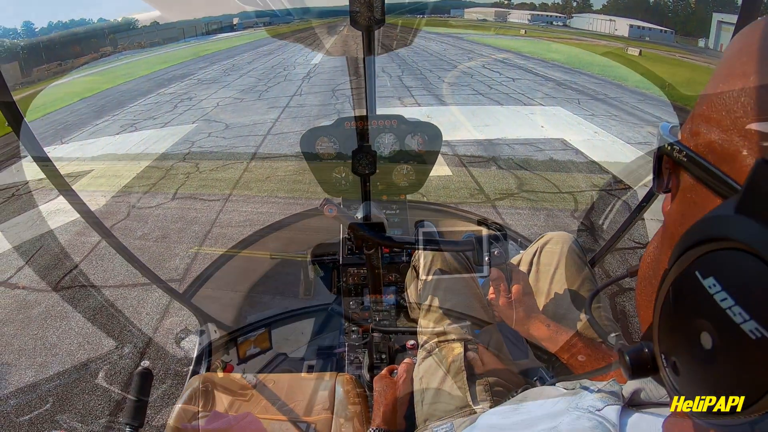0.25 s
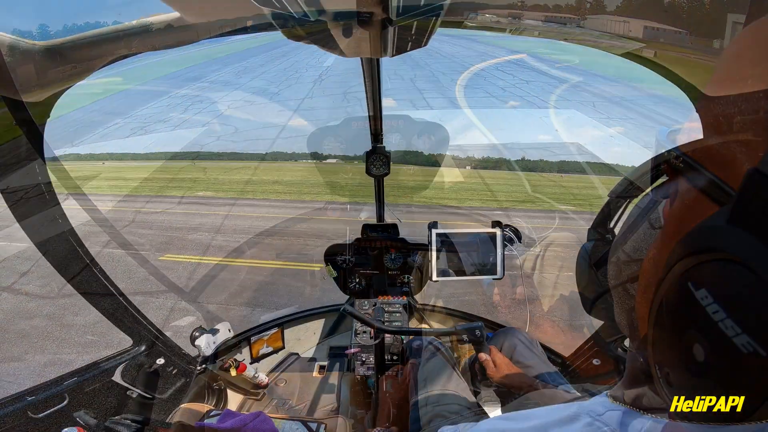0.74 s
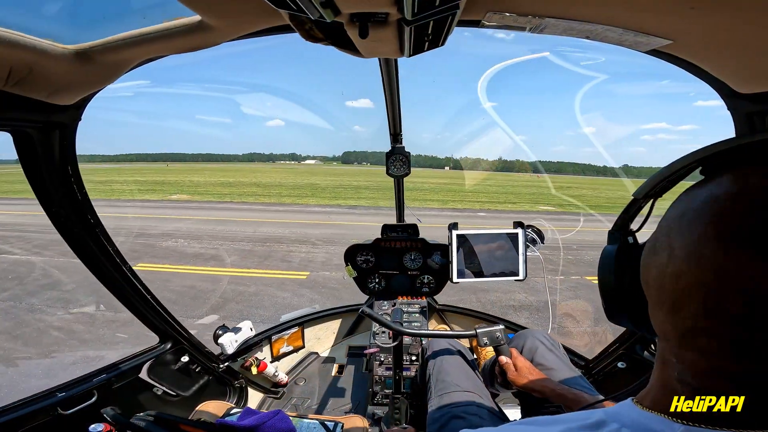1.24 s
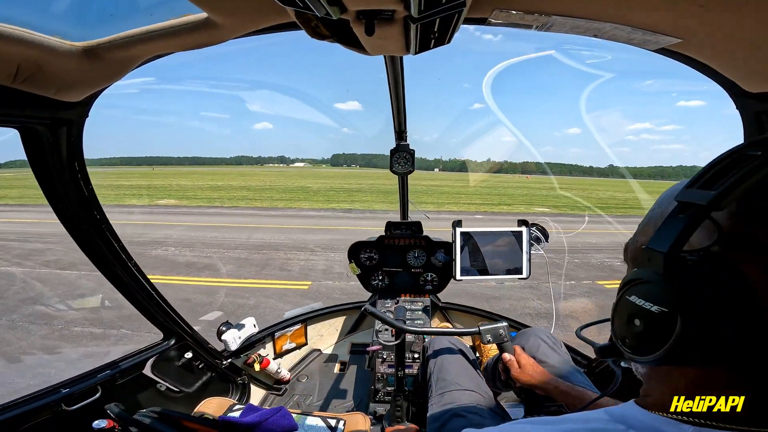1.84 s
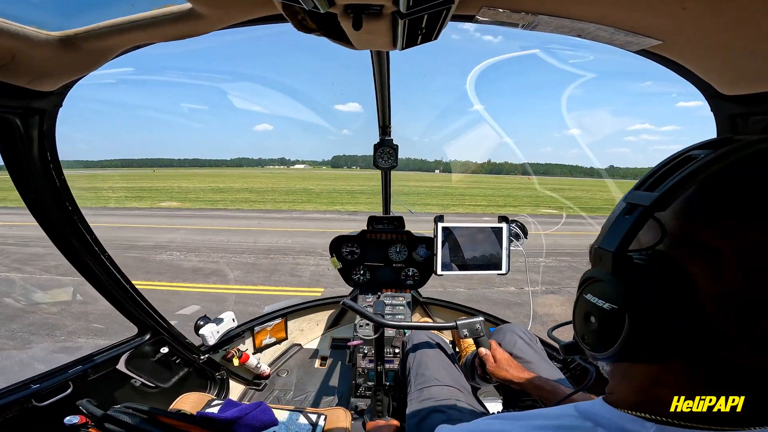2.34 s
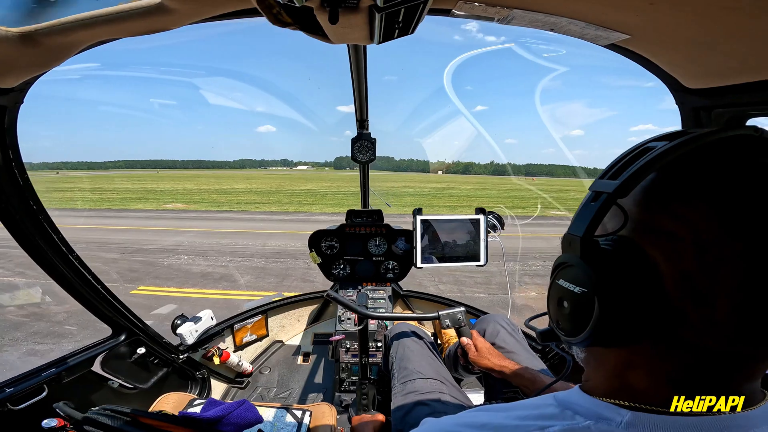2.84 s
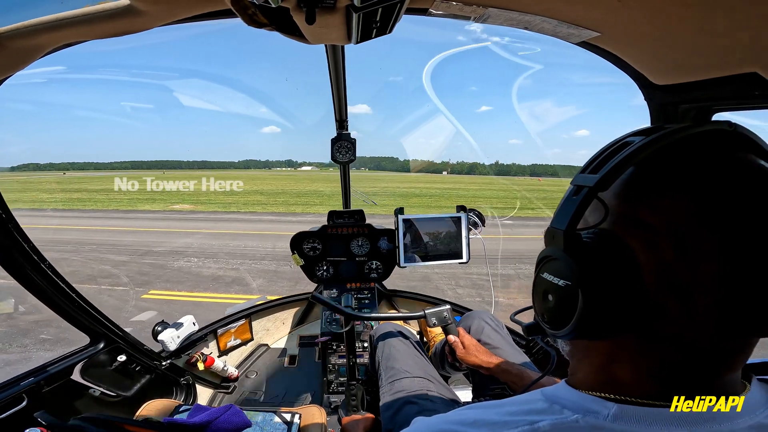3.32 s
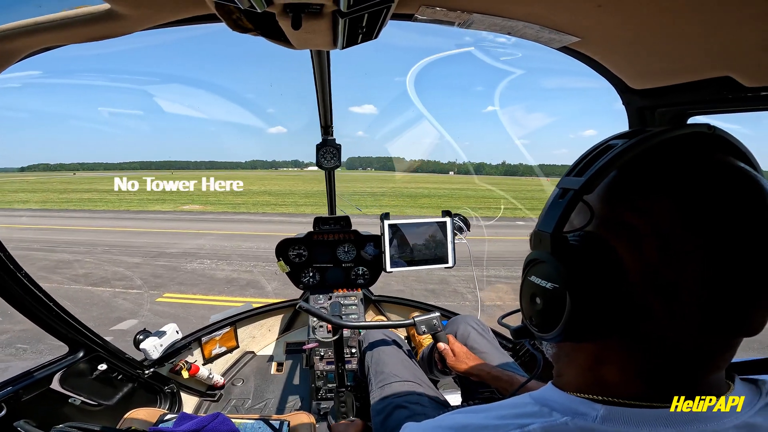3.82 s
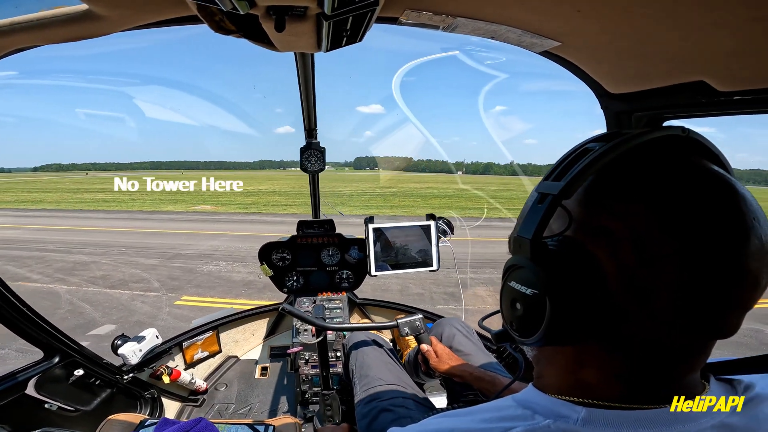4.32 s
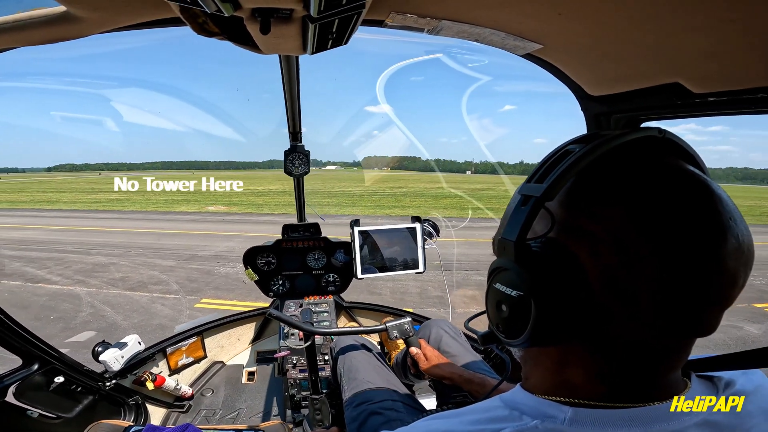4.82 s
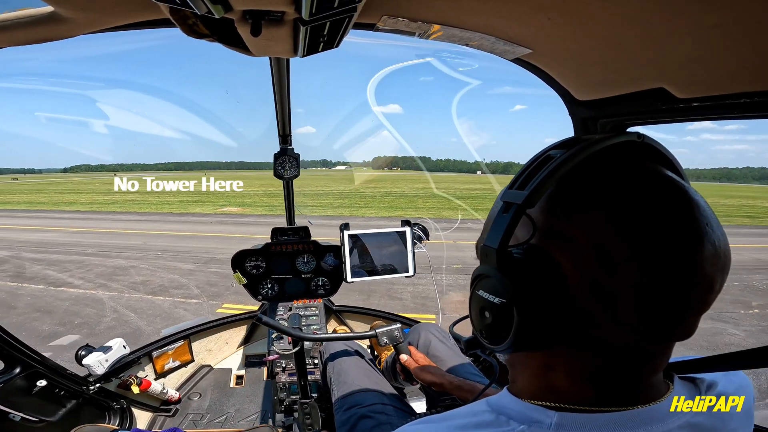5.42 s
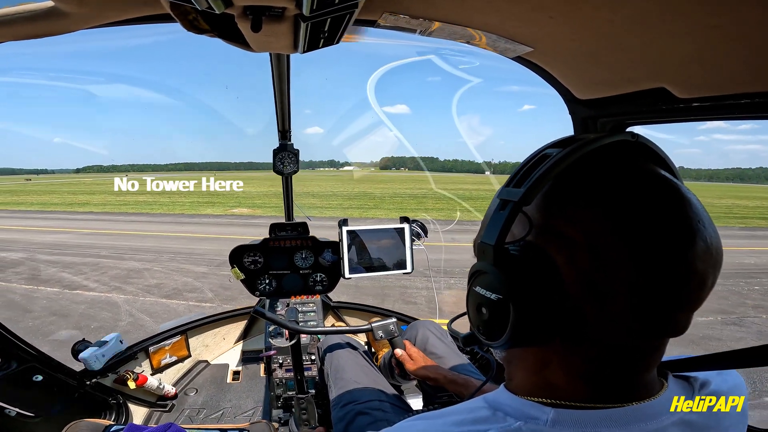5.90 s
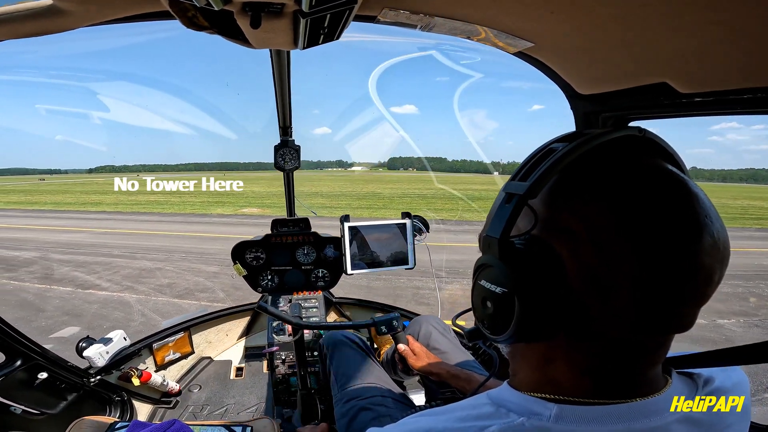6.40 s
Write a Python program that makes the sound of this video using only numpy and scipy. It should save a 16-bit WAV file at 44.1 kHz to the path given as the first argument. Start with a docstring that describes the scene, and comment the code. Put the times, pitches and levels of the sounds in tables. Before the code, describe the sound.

Inside a piston helicopter cabin, a steady low engine drone fades up, with uneven rotor throb, soft rasp and a muffled rush of air.

```python
"""Inside the cabin of a hovering piston helicopter, heard in order of time.
From the start a six-cylinder engine hums as harmonics of its cycle, and noise puffs rasp at each firing.
Geared to the same rotation, the main rotor throbs and the tail rotor buzzes; filtered noise is the rush of air.
The gain rises linearly over the first 2.5 s; the blade throb then grows unevenly.
After about 5 s the rush of air swells slightly and stays up."""
import sys
import numpy as np
from scipy import signal
from scipy.fft import rfft, irfft, next_fast_len
from scipy.io import wavfile
from scipy.ndimage import uniform_filter1d, minimum_filter1d, map_coordinates

SR = 44100
rng = np.random.default_rng(int(sys.argv[2]) if len(sys.argv) > 2 else 0)


def materialize(psi):
    """Save the field psi as 16-bit PCM at rate SR to the path in sys.argv[1].

    A 1-D psi becomes a single channel; in a 2-D psi each row is a channel.
    """
    bounded = np.clip(np.atleast_2d(psi).T, -1, 1)
    quanta = np.round(bounded * 32767).astype(np.int16)
    wavfile.write(sys.argv[1], SR, quanta)


N = 293441  # samples
TIME_S = np.arange(N) / SR


def amp(db):
    """Level law: a gain is ten to the power of dB / 20."""
    return 10 ** (np.asarray(db) / 20)


def unit(x):
    """Normalisation: the signal scaled to rms 1."""
    return x / np.sqrt(np.mean(x ** 2) + 1e-20)


def along(points, hz):
    """Logarithmic interpolation: (f/Hz, value) points joined on a log frequency axis."""
    f, v = np.transpose(points)
    return np.interp(np.log(hz + 1), np.log(f + 1), v)


def curves(rows):
    """Linear interpolation in time: one curve for each column after t/s."""
    t, *columns = np.transpose(rows)
    return [np.interp(TIME_S, t, column) for column in columns]


def ramp(start_s, length_s):
    """Linear onset: 0 until the start, a straight rise to 1, then held."""
    return np.clip((TIME_S - start_s) / length_s, 0, 1)


def wobble(rate):
    """Slow random modulation: a smooth curve through random knots, rate knots a second."""
    coarse = np.arange(0, N + 64, 64)
    knots = rng.standard_normal(int(N * rate / SR) + 4)
    smooth = map_coordinates(knots, [coarse * rate / SR + 1])
    return np.interp(np.arange(N), coarse, smooth)


def filtered(x, response):
    """Linear filtering: the spectrum multiplied by a response of frequency."""
    size = next_fast_len(N + SR // 2)
    hz = np.fft.rfftfreq(size, 1 / SR)
    return irfft(rfft(x, size) * response(hz), size)[:N]


def coloured(x, spectrum):
    """Spectral shaping: the signal through an (f/Hz, level/dB) response, at rms 1."""
    return unit(filtered(x, lambda hz: amp(along(spectrum, hz))))


def harmonics(turns, orders, flutter_db, smear, rate, dispersion):
    """Fourier synthesis: phase-locked multiples of a rotation, dispersed and wavering in phase and level.

    flutter_db and smear (rad) scale the wavering, rate is in knots a second; the sum has rms 1.
    """
    total = np.zeros(N)
    for multiple, db in orders:
        phase = 2 * np.pi * multiple * turns + dispersion * multiple ** 2 + smear * wobble(rate)
        total += amp(db + flutter_db * wobble(rate)) * np.sin(phase)
    return unit(total)


CYLINDERS = 6
# airframe dispersion: phase shift in radians per squared multiple of the engine cycle
DISPERSION = .557
GROWL_DB = -34.5
# multiples of the engine cycle: the slowly beating line and the singing panel
BEAT_ORDER, PANEL_ORDER = 9, 30
# slow beat: mean level (dB), depth (dB), first peak (s), period (s)
BEAT_DB, BEAT_DEPTH_DB, BEAT_PEAK_S, BEAT_PERIOD_S = -44, 3.5, 0.92, 1.06
# growl of unequal cylinders: [multiple of the engine cycle, relative level/dB]
GROWL_ORDERS = [(1, -44), (2, -43), (3, -48), (4, -48), (5, -38.5), (8, -54.5), (10, -43.5), (11, -53),
                (13, -49), (15, -59), (16, -51.5), (17, -58), (18, -51), (19, -56), (20, -53.5),
                (21, -52.5), (22, -58.5), (23, -52.5), (24, -55), (26, -57.5), (27, -58.5), (28, -54.5),
                (29, -56), (32, -63.5), (34, -61.5), (35, -66)]
# high engine orders that set the panels singing: [multiple of the engine cycle, relative level/dB]
WHINE_ORDERS = [(33, -1), (36, -5), (39, -12.5), (48, -18.5)]
# slow waxing and waning of the firing hum: [t/s, level/dB]
HUM_LEVEL = [(0, -27.5), (.6, -29.3), (1.05, -32.5), (1.5, -30), (2, -29), (2.6, -28.5), (3.4, -29.5),
             (4.4, -30.5), (4.95, -31.5), (5.3, -29.5), (6, -32), (6.65, -33)]
# octave of the firing hum: [t/s, level/dB]
OCTAVE_LEVEL = [(0, -45), (.9, -36.5), (1.4, -41.5), (1.85, -37.5), (2.5, -44), (3.6, -42.5), (4.3, -40.5),
                (5, -42), (5.8, -47.5), (6.65, -43)]
# single panel tone, with a short dip near 2.5 s and a rise at the end: [t/s, level/dB]
PANEL_LEVEL = [(0, -50.5), (1.95, -48.4), (2.55, -56), (2.9, -50.5), (5.2, -52.5), (5.85, -50), (6.25, -51),
               (6.65, -43)]
# swelling and sinking of the panels' whine: [t/s, level/dB]
WHINE_LEVEL = [(0, -54), (.7, -48), (1.3, -49.5), (1.8, -51.5), (2.6, -49.5), (3.05, -48.5), (4.2, -50),
               (5.05, -53.5), (5.6, -48.5), (6.65, -45.5)]


def engine(cycles):
    """Harmonic excitation: equal firings give hum and octave, unequal ones growl, and panels sing along."""
    hum_db, = curves(HUM_LEVEL)
    octave_db, = curves(OCTAVE_LEVEL)
    panel_db, = curves(PANEL_LEVEL)
    whine_db, = curves(WHINE_LEVEL)
    beat_phase = 2 * np.pi * (TIME_S - BEAT_PEAK_S) / BEAT_PERIOD_S
    beat_db = BEAT_DB + BEAT_DEPTH_DB * np.cos(beat_phase)
    hum = harmonics(cycles, [(CYLINDERS, 0)], flutter_db=.35, smear=.05, rate=7, dispersion=DISPERSION)
    octave = harmonics(cycles, [(2 * CYLINDERS, 0)], flutter_db=.8, smear=.12, rate=10, dispersion=DISPERSION)
    beat = harmonics(cycles, [(BEAT_ORDER, 0)], flutter_db=.1, smear=.17, rate=5.2, dispersion=.584)
    growl = harmonics(cycles, GROWL_ORDERS, flutter_db=1.0, smear=.19, rate=3, dispersion=DISPERSION)
    panel = harmonics(cycles, [(PANEL_ORDER, 0)], flutter_db=1.2, smear=.17, rate=4, dispersion=DISPERSION)
    whine = harmonics(cycles, WHINE_ORDERS, flutter_db=.5, smear=.068, rate=4, dispersion=DISPERSION)
    firing = amp(hum_db) * hum + amp(octave_db) * octave
    uneven = amp(beat_db) * beat + amp(GROWL_DB) * growl
    return firing + uneven + amp(panel_db) * panel + amp(whine_db) * whine


RASP_DB = -47
# exhaust puff strength of each cylinder in firing order: [relative level/dB]
PUFF_LEVEL = [1.2, 0.33, -1, -1, 1.8, 0]
# exhaust pulses after muffler and firewall: [f/Hz, relative level per Hz/dB]
RASP_SPECTRUM = [(150, -26), (400, -6.5), (750, 0), (950, -10), (1300, -11), (1700, -23), (2300, -20.5),
                 (4000, -36), (8000, -120)]


def exhaust(cycles, puff_share):
    """Pulsed turbulence: noise decays exponentially after each firing, with time constant puff_share of a gap."""
    firings = cycles * CYLINDERS
    cylinder = np.floor(firings).astype(int) % CYLINDERS
    envelope = amp(PUFF_LEVEL)[cylinder] * np.exp(-(firings % 1) / puff_share)
    puffs = envelope * rng.standard_normal(N)
    return amp(RASP_DB) * coloured(puffs, RASP_SPECTRUM)


# trim buzz: level (dB), fall with pitch (dB an octave)
BUZZ_DB, BUZZ_FALL_DB = -57.5, 4


def buzz(cycles, first_order, last_order):
    """Forced vibration: the trim buzzes at high engine multiples, each wavering on its own."""
    orders = []
    for multiple in range(first_order, last_order + 1):
        orders.append((multiple, -BUZZ_FALL_DB * np.log2(multiple / first_order)))
    return amp(BUZZ_DB) * harmonics(cycles, orders, flutter_db=5.5, smear=.18, rate=3, dispersion=DISPERSION)


# blade passes per engine cycle
MAIN_GEAR, TAIL_GEAR = .5978, 3.551
# multiples of the engine cycle: the drive shaft's tone and the low hum
SHAFT_ORDER, LOW_HUM_ORDER = 1.4476, 3.51549
BLADE_DB, BUFFET_DB, TAIL_DB, SHAFT_DB = -39.5, -42.5, -43, -44.5
# steady beat of the main blades: [multiple of the blade-passing rate, relative level/dB]
BLADE_ORDERS = [(1, -43), (5, -52.5), (6, -54.5), (7, -52), (8, -52.5), (9, -50.5), (11, -54), (12, -61),
                (13, -52.5), (16, -51), (18, -58.5), (22, -58.5)]
# blade multiples that boom in the cabin air: [multiple of the blade-passing rate, relative level/dB]
THROB_ORDERS = [(2, -6.5), (3, 2), (4, -1)]
# throb, growing unevenly as the main rotor takes up load: [t/s, level/dB]
THROB_LEVEL = [(0, -40), (.6, -43), (1.3, -37), (2.3, -47.5), (2.85, -33), (3.7, -32), (4.1, -33.5),
               (4.5, -32), (5.1, -30), (5.8, -34.5), (6.25, -34.5), (6.65, -30.5)]
# downwash pressing on the cabin bubble: [f/Hz, relative level per Hz/dB]
BUFFET_SPECTRUM = [(8, -13.5), (22, -4), (36, -0.5), (50, 0.5), (65, -3.5), (110, -12), (220, -40),
                   (600, -120)]
# low hum near 80 Hz, swelling and sinking: [t/s, level/dB]
LOW_HUM_LEVEL = [(0, -43), (1.15, -40), (1.6, -48.5), (2.25, -53), (2.65, -42), (3.85, -41), (4.35, -50),
                 (4.8, -40), (5.25, -50), (6.1, -46), (6.65, -43)]
# buzz of the tail rotor: [multiple of its blade-passing rate, relative level/dB]
TAIL_ORDERS = [(2, -52.5), (3, -47), (4, -48), (5, -58)]


def rotors(cycles):
    """Blade-passing tones: multiples of each rotor's passing rate, with buffet noise, a shaft tone and a low hum."""
    throb_db, = curves(THROB_LEVEL)
    low_hum_db, = curves(LOW_HUM_LEVEL)
    main_passes = cycles * MAIN_GEAR
    tail_passes = cycles * TAIL_GEAR
    blades = harmonics(main_passes, BLADE_ORDERS, flutter_db=2.5, smear=.14, rate=3.2, dispersion=1.25)
    throb = harmonics(main_passes, THROB_ORDERS, flutter_db=1.0, smear=.1, rate=4.1, dispersion=2.1)
    buffet = coloured(rng.standard_normal(N), BUFFET_SPECTRUM)
    low_hum = harmonics(cycles, [(LOW_HUM_ORDER, 0)], flutter_db=2.4, smear=.23, rate=2.4, dispersion=0)
    tail = harmonics(tail_passes, TAIL_ORDERS, flutter_db=2.5, smear=.23, rate=3, dispersion=.69)
    shaft = harmonics(cycles, [(SHAFT_ORDER, 0)], flutter_db=1.0, smear=.25, rate=2.2, dispersion=0)
    main_rotor = amp(BLADE_DB) * blades + amp(throb_db) * throb + amp(BUFFET_DB) * buffet
    return main_rotor + amp(low_hum_db) * low_hum + amp(TAIL_DB) * tail + amp(SHAFT_DB) * shaft


# levels before the late swell (dB), and the multiple of the engine cycle at which the wash flutters
WASH_DB, HISS_DB, FLUTTER_ORDER = -34.5, -55.5, 4
# late swell: start (s), time taken (s), rise of the wash and of the hiss (dB)
SWELL_START_S, SWELL_S, WASH_SWELL_DB, HISS_SWELL_DB = 5.2, 0.9, 2, 1.1
# turbulent air heard through the shell: [f/Hz, relative level per Hz/dB]
WASH_SPECTRUM = [(20, -23), (62, -2.5), (115, 1.5), (185, -2), (245, -1.5), (285, -2), (350, -4.5),
                 (500, -7.5), (740, -13.5), (900, -18), (1250, -24.5), (1650, -36.5), (3000, -64.5),
                 (8000, -120)]
# air leaking at doors and vents: [f/Hz, relative level per Hz/dB]
HISS_SPECTRUM = [(600, -19), (1200, 0.5), (1500, 0), (1750, 0), (2250, 0), (2650, -3.5), (3080, -5),
                 (3400, -8.5), (4300, -15), (5300, -18), (6400, -23.5), (7400, -25), (7950, -32),
                 (8600, -29.5), (10700, -36), (14300, -39), (15300, -44.5)]
# thin resonances that colour the hiss: [centre f/Hz, width f/Hz, boost level/dB]
SHEEN = [(11800, 450, 4.5), (13700, 650, 8)]


def sheen(hz):
    """Resonant emphasis: Gaussian peaks in level over frequency."""
    return amp(sum(db * np.exp(-((hz - centre) / width) ** 2) for centre, width, db in SHEEN))


def air(cycles, chop_db, lope_db, flutter_db):
    """Amplitude-modulated turbulence: blades pulse wash and hiss; the engine cycle also modulates the wash."""
    chop = chop_db * np.cos(2 * np.pi * cycles * MAIN_GEAR)
    lope = lope_db * np.cos(2 * np.pi * cycles)
    flutter = flutter_db * np.cos(2 * np.pi * cycles * FLUTTER_ORDER)
    wash = coloured(rng.standard_normal(N), WASH_SPECTRUM)
    wash *= amp(chop + lope + flutter + .3 * wobble(7.3))
    hiss = coloured(filtered(rng.standard_normal(N), sheen), HISS_SPECTRUM)
    hiss *= amp(chop + .25 * wobble(8))
    swell = ramp(SWELL_START_S, SWELL_S)
    return amp(WASH_DB + WASH_SWELL_DB * swell) * wash + amp(HISS_DB + HISS_SWELL_DB * swell) * hiss


# almost steady engine speed, before a slight random wavering: [t/s, four-stroke cycle rate f/Hz]
SPEED = [(0, 22.77), (.9, 22.76), (1.4, 22.71), (1.65, 22.64), (2.1, 22.64), (2.7, 22.77), (3.1, 22.825),
         (3.7, 22.84), (4.2, 22.77), (4.65, 22.73), (5.1, 22.76), (5.9, 22.78), (6.3, 22.845),
         (6.65, 22.78)]


def scene():
    """Phase locking: engine, rotors and the pulsing of the air all follow one rotation."""
    speed_hz, = curves(SPEED)
    cycles = np.cumsum(speed_hz * (1 + 0.00017 * wobble(8))) / SR
    rasp = exhaust(cycles, puff_share=0.81)
    trim = buzz(cycles, first_order=40, last_order=65)
    wind = air(cycles, chop_db=0.2, lope_db=-0.1, flutter_db=.5)
    return (engine(cycles) + rasp + trim + rotors(cycles) + wind)[None]


def limiter(x, ceiling_db, size):
    """Peak limiting: the gain ducks smoothly for a few milliseconds around any peak near the ceiling."""
    needed = (1 + (x / amp(ceiling_db)) ** 10) ** (-1 / 10)
    held = minimum_filter1d(needed, 2 * size)
    return x * uniform_filter1d(uniform_filter1d(held, size), size)


# straight-line fade-in of gain: opening level (dB), length (s); then the band limit (Hz)
FADE_FROM_DB, FADE_S, TOP_HZ = -11.5, 2.52, 15700


def record(dry):
    """Gain control and band limiting: peaks are held down, the gain fades in and a steep low-pass follows."""
    held = limiter(dry[0], ceiling_db=-17.2, size=180)
    fade = amp(FADE_FROM_DB) + (1 - amp(FADE_FROM_DB)) * ramp(0, FADE_S)
    soft_ends = signal.windows.tukey(N, .001)
    steep = signal.ellip(10, .1, 80, TOP_HZ, fs=SR, output="sos")
    return signal.sosfiltfilt(steep, held * fade * soft_ends)[None]


dry = scene()
out = record(dry)
materialize(out)
```